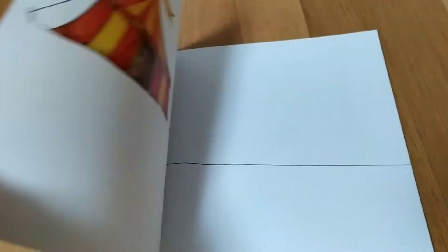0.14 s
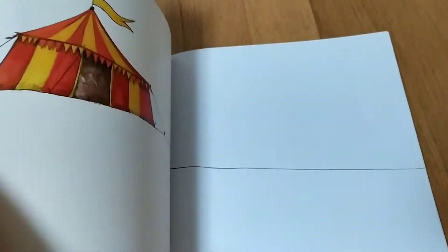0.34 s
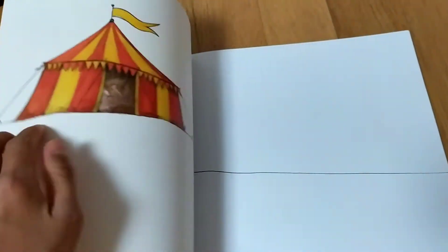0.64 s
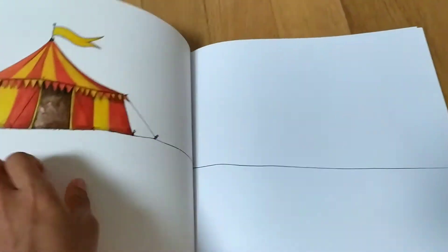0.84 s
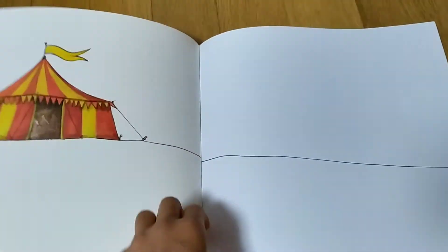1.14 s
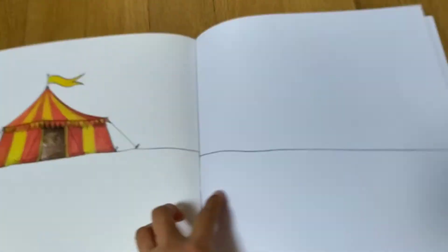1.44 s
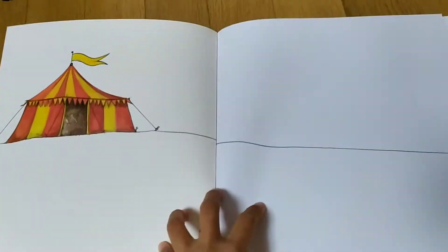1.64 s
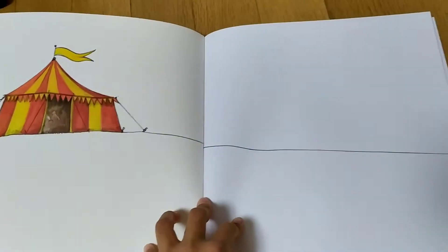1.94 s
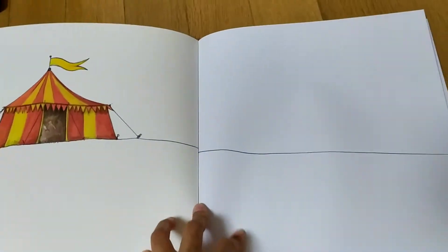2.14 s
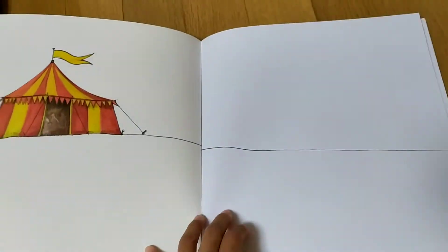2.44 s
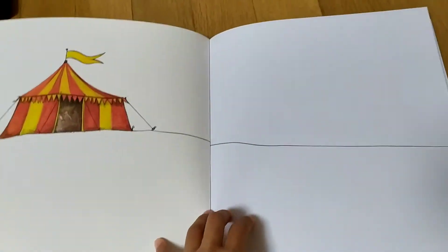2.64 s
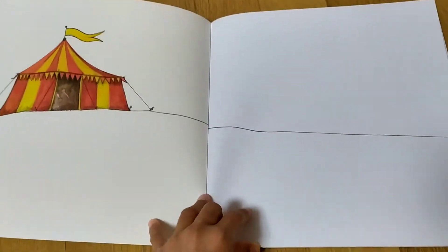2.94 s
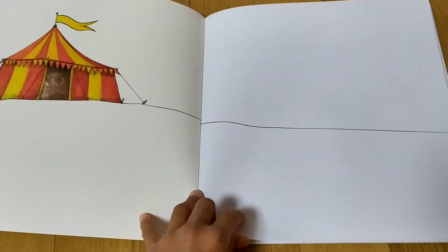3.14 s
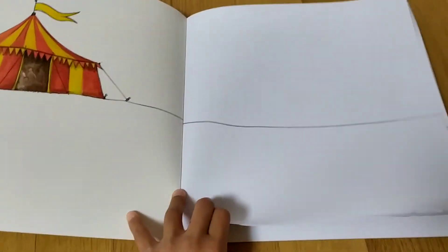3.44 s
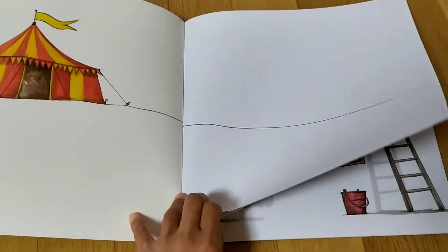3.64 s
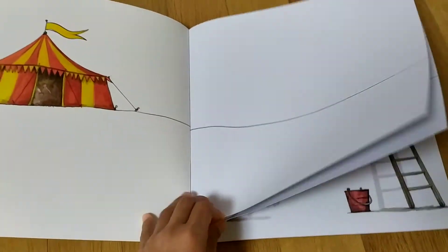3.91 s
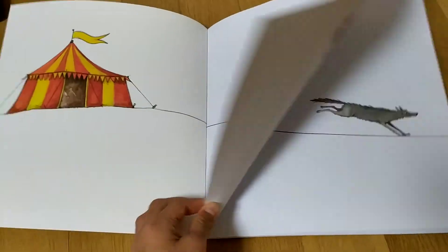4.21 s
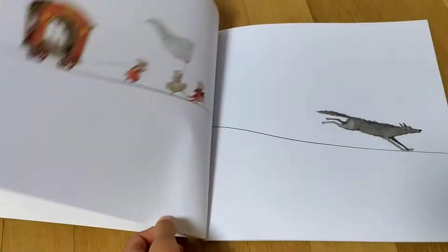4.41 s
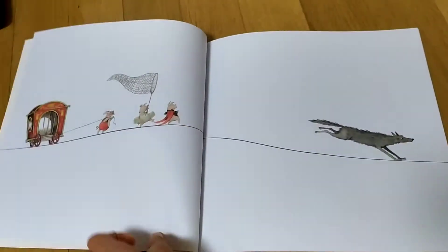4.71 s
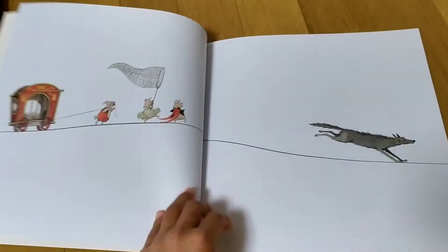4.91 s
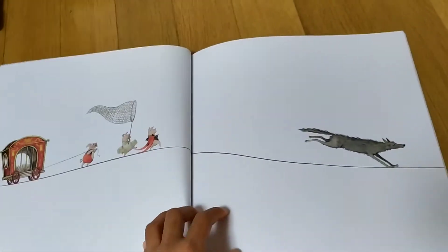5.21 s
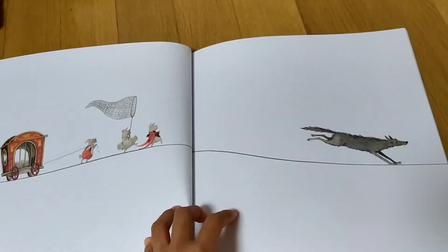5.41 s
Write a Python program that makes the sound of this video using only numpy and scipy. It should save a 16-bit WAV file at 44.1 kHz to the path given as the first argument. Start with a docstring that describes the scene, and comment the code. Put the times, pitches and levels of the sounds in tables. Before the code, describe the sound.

Close stereo phone pickup in a small quiet room: dry skin slides over thick paper, with dull pops as the sheet bends. Smoothing swishes swell at about one second, thin out, and a crisp loud snap stands alone. Light fingering follows, then scattered clicks build into a crackly page turn and fade to small ticks over soft hiss and wavering low rumble.

```python
"""Dry rubbing of skin on paper first: a hand slides over the stiff pages of a picture book and turns them.
Rubs are dense random stick-slip clicks, filtered into drag, scrape, hiss and flex and swelled per stroke.
Buckling sheets snap in few-ms crack bursts that ring damped modes.
A small furnished room answers with diffuse echoes, over filtered low noise that swells and wavers, and faint hiss.
Heard close up through the two ports of a phone."""
import sys
import numpy as np
from scipy import signal
from scipy.fft import rfft, irfft
from scipy.io import wavfile
from scipy.ndimage import uniform_filter1d, map_coordinates

SR = 44100
rng = np.random.default_rng(int(sys.argv[2]) if len(sys.argv) > 2 else 0)


def output_pcm(signal):
    """Save a mono or channel-first signal as 16-bit PCM at the path in sys.argv[1].

    Samples are clipped to [-1, 1] before scaling.
    """
    pcm = np.clip(np.atleast_2d(signal).T, -1, 1) * 32767
    wavfile.write(sys.argv[1], SR, np.round(pcm).astype(np.int16))


N = 245195
TIME_S = np.arange(N) / SR

# Rise and fade times below 5 ms, negatives included, act as 5 ms.
# strokes over paper: full from t/s, rise/(s per 20 dB), hold/s, fade/(s per 20 dB), level/dB,
# weight/dB (heavy and dull above 0, light and fine below)
STROKES = [(0.088, 0.038, 0.0034, 0.092, -52.5, -8.5), (.21, .06, 0.035, 0.15, -66, -2.5),
           (.42, 0.23, 0.058, .05, -66, -3), (.55, 0.091, 0.013, 0.048, -57, -1.5),
           (.60, 0.16, 0.025, 0.054, -60, -49), (.68, .03, 0.17, .05, -63, -11),
           (.84, .04, .04, .1, -54, -8), (.99, .16, 0.029, 0.12, -44, -4.5),
           (1.16, 0.17, .03, 0.092, -45, -1.5), (1.30, 0.12, .01, 0.043, -56, 0),
           (1.365, 0.11, 0.026, 0.07, -54.5, -1), (1.469, 0.11, 0.055, 0.077, -48, 0.5),
           (1.575, 0.18, 0.019, 0.12, -49, 5), (1.64, .1, 0.044, 0.03, -51.5, -3.5),
           (1.72, 0.046, .13, 0.04, -61.5, -5.5), (1.89, 0.051, 0.022, 0.076, -55, -6),
           (2.225, 0.012, 0.12, 0.059, -59, -3), (2.335, 0.065, 0.023, 0.055, -44.5, -15),
           (2.373, 0.041, 0.0083, 0.077, -44.5, 4), (2.46, .05, 0.065, 0.056, -62, -11),
           (2.599, 0.032, 0.087, 0.15, -63.5, -9.5), (2.808, 0.027, 0.11, 0.041, -63, -7.5),
           (2.98, 0.043, .02, 0.11, -52, -9), (3.06, 0.055, 0.048, 0.037, -60.5, -11),
           (3.2, 0.11, 0.0093, 0.022, -68, -8), (3.319, 0.014, 0.0078, 0.089, -56, -4),
           (3.43, 0.098, 0.013, 0.18, -56.5, -13), (3.58, .03, 0.12, .05, -70, 6),
           (3.72, 0.024, 0.059, 0.044, -57.5, 4), (3.82, 0.06, 0.033, 0.032, -45.5, -13),
           (3.868, 0.029, 0.0044, 0.099, -52, 1.5), (4.024, 0.035, 0.024, 0.094, -55.5, 3),
           (4.089, 0.034, 0.011, 0.055, -53, 2), (4.16, 0.055, 0.11, .05, -60.5, -5),
           (4.28, 0.065, 0.096, .05, -58, -2), (4.384, 0.059, 0.043, 0.065, -53.5, -1),
           (4.488, 0.088, 0.0051, 0.099, -47.5, 1), (4.644, 0.028, 0.016, .03, -53, -25),
           (4.684, 0.039, 0.018, 0.084, -45, -3), (4.8, 0.073, 0.009, .08, -63, -15),
           (4.9, .08, 0.03, .05, -68.5, -3), (4.973, 0.026, 0.0058, 0.078, -48, -10),
           (5.04, 0.055, 0.031, 0.064, -60.5, -10), (5.171, 0.051, 0.074, 0.13, -52.5, -0.5),
           (5.36, 0.055, 0.061, 0.057, -71.5, -24), (5.49, 0.098, 0.0072, 0.059, -67, -3)]
# drag, scrape, hiss against the stroke: offset/dB, slope/(dB per dB of weight)
STROKE_FOLLOW = [(-2, 0.96), (-1, 0.2), (0, -0.12)]
# sheet bending and fluttering: full from t/s, level/dB, rise/(s per 20 dB), hold/s, fade/(s per 20 dB)
BENDS = [(0.09, -67.5, 0.7, .01, 0.27), (.47, -68.5, 0.24, 0.0092, 0.6), (0.54, -55.5, -0.19, 0.016, 0.04),
         (0.779, -60, -0.02, .01, .03), (0.836, -65, 0.2, .01, 0.4), (0.99, -61.5, 0.23, 0.0089, 0.34),
         (1.161, -51.5, 0.01, 0.03, 0.07), (1.339, -53.5, 0.1, 0.026, 0.04),
         (1.464, -56.5, -0.2, 0.011, 0.16), (1.725, -66, 0.2, 0.0093, 0.35),
         (1.913, -66, -0.4, 0.0067, 0.24), (2.362, -53.5, 0.08, 0.016, 0.12),
         (2.968, -66.5, 0.5, 0.046, -0.08), (3.32, -65, -0.15, .01, 0.15), (3.431, -58, -0.07, .01, 0),
         (3.496, -65, -0.1, 0.3, 0), (3.778, -59.5, 0.12, 0.1, 0.7), (4.039, -55.5, -0.06, .05, 0.26),
         (4.24, -55.5, 0.18, .01, -0.01), (4.29, -60.5, 0.7, 0.055, -0.2), (4.37, -57, 0.12, 0.0086, -0.13),
         (4.437, -50.5, -0.03, 0.064, 0.07), (4.564, -64.5, 0.3, 0.045, .06),
         (4.66, -59.5, -0.5, 0.045, .06), (4.79, -72, -1.2, 0.0077, 0.2), (4.97, -61.5, -0.1, 0.0077, 0.06),
         (5.17, -67.5, 0.5, 0.057, 0.5)]
# relative spectra of the four rubbing layers: f/Hz, density/dB
DRAG_SPECTRUM = [(200, -60), (400, -38), (520, -8), (650, -4.5), (820, 0), (1100, -6), (1450, -3),
                 (2000, -12), (4000, -68)]
SCRAPE_SPECTRUM = [(400, -70), (1000, -15), (1500, -8), (2200, -5.5), (2900, -4.5), (3500, -9),
                   (4200, -13.5), (5500, -30), (10000, -56)]
HISS_SPECTRUM = [(900, -50), (2600, -5), (3500, -10), (5500, -5.5), (6800, -9), (9300, -7.5), (11000, -11),
                 (13300, -15), (15500, -13.5), (16500, -22)]
FLEX_SPECTRUM = [(100, -11), (200, -13.5), (320, 3), (500, -1.5), (800, -5), (2000, -64)]

# buckling snaps: start t/s, knock level/dB, click level/dB, crisp level/dB, thud level/dB, burst rise/ms
SNAPS = [(.046, -56.5, -51, -62, -53, 1.7), (0.223, -43, -42, -55, -46, 4),
         (0.467, -49.5, -51, -76, -51, 1.95), (.502, -36, -34, -43.5, -39, 1.8),
         (.549, -64, -45, -66, -46, 2.1), (.82, -44, -40, -46.5, -36.5, 1.4),
         (.856, -51, -65, -54, -75, 1.5), (0.938, -58, -55, -64, -49, 1.8),
         (1.299, -46.5, -51, -70, -64, 1.36), (1.328, -32.5, -42.5, -65, -37, 3.1),
         (1.395, -56, -46.5, -63, -74, 2), (1.722, -49.5, -64, -70, -55, 1.5),
         (1.903, -47.5, -51, -41, -56, 1.93), (2.209, -49.5, -48.5, -51, -70, 1.93),
         (2.225, -64, -51.5, -50, -63, 4.4), (2.352, -48.5, -37, -37, -60, 3.4),
         (2.357, -25, -22, -33.5, -42, 1.8), (2.364, -33.5, -38, -40, -55, 2.5),
         (2.874, -78, -61, -51, -78, 3.3), (2.883, -67, -59, -49.5, -66.5, 2.2),
         (2.951, -46, -47.5, -50.5, -51, 2.1), (3.31, -59.5, -51.5, -49, -58, 2.5),
         (3.526, -35.5, -35.5, -54, -45.5, 3.4), (3.532, -34, -64, -54, -43, 2.85),
         (3.539, -45, -62, -57, -65, 2.3), (3.548, -68, -38.5, -69, -50, 1.02),
         (3.553, -35.5, -72, -59, -46, 1.6), (3.702, -42, -44.5, -49.5, -54, 2.1),
         (3.754, -57, -46.5, -54, -50, 1.2), (3.856, -29, -42, -50, -51, 0.64),
         (4.003, -48.5, -67, -79, -47.5, 1.2), (4.011, -29.5, -27.5, -58, -51, 1.6),
         (4.067, -52, -43, -52, -61, 2.5), (4.073, -55, -50, -43, -65, 3.5),
         (4.078, -35.5, -39, -39, -47, 1.92), (4.237, -48, -64, -54, -67, 2.55),
         (4.392, -36.5, -67, -47, -43, 2.56), (4.44, -63, -66, -50, -45, 0.87),
         (4.446, -37, -48, -50, -39.5, 1.9), (4.465, -47, -50, -46, -60, 2.6),
         (4.472, -32, -29, -34.5, -55, 2.42), (4.483, -33.5, -45, -48, -42.5, 1.6),
         (4.634, -60, -58, -44.5, -64, 2.5), (4.673, -36.5, -29.5, -26, -57, 2.54),
         (4.955, -47, -47.5, -41.5, -45.5, 1.35), (4.965, -46, -47.5, -40.5, -43.5, 2.6),
         (5.155, -35.5, -31, -71, -67, 1.6), (5.206, -46.5, -66, -52, -50, 1.4),
         (5.222, -55, -42.5, -39.5, -48, 1.75), (5.243, -44, -39, -42.5, -50.5, 3.8),
         (5.282, -47.5, -55, -49, -56, 2.1), (5.334, -54.5, -68, -58, -55, 4.2),
         (5.526, -58, -68, -75, -82, 3.25)]
# sheet modes before scatter: f/Hz, level/dB, t60/s
SHEET_MODES = [(342, 6.5, 0.03), (497, -5.5, 0.017), (822, -6, 0.035), (1173, -8, 0.042),
               (1496, 11.5, 0.0071), (2310, 10, 0.0031), (2850, 4, 0.019)]
SNAP_ENERGY_DB = 21  # added to every part level: part energy, in samples
RATTLE_DB, RING_DB = -22.5, -33.0

# room: f/Hz, t60/s, left-right likeness/0-1 (also used for the background hiss)
ROOM = [(102, 0.2, 1), (490, 0.24, 0.45), (2150, 0.22, 0.18), (6960, 0.23, 0.1), (14400, 0.032, 0.1)]
ROOM_DB = -8

# low rumble swells: peak t/s, level/dB, rise/(s per 20 dB), fade/(s per 20 dB)
LOW_SWELLS = [(.51, -61, 0.3, 0.35), (0.819, -50, -0.58, -0.86), (.93, -53, -0.42, -0.1),
              (1.19, -61.5, 0.04, 0.14), (2.37, -65, -0.05, 0.26), (3.87, -63, 0.38, 0.6),
              (4.03, -64, -0.05, 1.2), (4.4, -45, 0.02, -0.53), (4.52, -49, .12, 0.19),
              (4.97, -63.5, -0.35, -0.6), (5.31, -56, -1.2, -0.3)]
# relative spectrum of the low noise: f/Hz, density/dB
LOW_SPECTRUM = [(13, -37), (22, -27), (38, -9), (54, 4), (170, -7.5), (220, -16), (370, -120)]
LOW_FLOOR_DB, LOW_WAVER_DB = -70, 1.2
# relative spectrum of the background hiss: f/Hz, density/dB
QUIET_SPECTRUM = [(76, -45), (130, -12), (317, -8.5), (430, -20), (516, -12), (571, -15), (1340, -16),
                  (8980, -20), (12900, -22), (16500, -33)]
QUIET_DB, QUIET_WAVER_DB = -69.5, 1.4

# extra path to the left port: t/s, lag/s
LEFT_LAG = [(0, 0.00022), (1.2, 0.00013), (2.2, 0.000057), (5.56, 0.00017)]
# port colour: f/Hz, left minus right/dB
LEFT_TILT = [(30, 8), (60, 5), (125, 1.6), (250, 2), (500, -2), (1000, .4), (2500, 2.6), (8000, .8),
             (13000, 3)]
LOW_CUT_HZ, TOP_HZ = 38, 15950


def sliding():
    """Fibres catch and let go: slow slips drag and rumble as the sheet bends, quick ones scrape, fine ones hiss."""
    layers = (
        (DRAG_SPECTRUM, slips(per_s=3000, spread_db=2.2, patchy_db=1.5, apart=.35)),
        (SCRAPE_SPECTRUM, slips(per_s=5000, spread_db=2.1, patchy_db=1.5, apart=.7)),
        (HISS_SPECTRUM, slips(per_s=12000, spread_db=0.5, patchy_db=1.7, apart=1.7)),
        (FLEX_SPECTRUM, slips(per_s=2300, spread_db=0.0, patchy_db=-0.5, apart=0.2)))
    # overlapping strokes and bends add in power
    stroke_powers = np.array([swell(*row[:4]) ** 2 for row in STROKES])
    level_db, weight_db = np.transpose(STROKES)[4:]
    offset_db, slope = np.transpose(STROKE_FOLLOW)[:, :, None]
    layer_db = level_db + offset_db + slope * weight_db
    stroke_gains = np.sqrt(undb(2 * layer_db) @ stroke_powers)
    bend_gain = np.sqrt(sum((undb(db) * swell(s, *shape)) ** 2 for s, db, *shape in BENDS))
    gains = [*stroke_gains, bend_gain]
    return sum(unit(colour(x, spectrum)) * gain for (spectrum, x), gain in zip(layers, gains))


def slips(per_s, spread_db, patchy_db, apart):
    """Stick-slip clicks of uneven size in patches: one train shared by both ports, plus one of each port's own."""
    struck = rng.random((3, N)) < per_s / SR
    clicks = struck * rng.standard_normal((3, N)) * undb(spread_db * rng.exponential(size=(3, N)))
    patches_db = patchy_db * walk(90) + 1.2 * walk(20)
    return (clicks[0] + apart * clicks[1:]) * undb(patches_db)


def snaps():
    """Each buckle is a few ms of cracks that briefly ring the sheet, then a rattle dies away."""
    size, modes = int(SR / 8), len(SHEET_MODES)
    t = np.arange(size) / SR
    out = np.zeros((2, N + size))
    chance = rng.standard_normal((len(SNAPS), 4 * size + 2 * modes))
    for (start_s, knock_db, click_db, crisp_db, thud_db, rise_ms), draws in zip(SNAPS, chance):
        span = t / (rise_ms / 1000)
        rattle = np.exp(-t / 0.018) * (1 - np.exp(-span))
        burst = (span * np.exp(1 - span)) ** 2 + undb(RATTLE_DB) * rattle
        grain = draws[:size]
        cracks = grain * np.abs(draws[size:2 * size]) * burst
        cracks[np.argmax(burst)] += 5.0  # main fold gives way
        body = cracks + undb(RING_DB) * signal.fftconvolve(cracks, sheet_ring(t, draws[-2 * modes:]))[:size]
        port_grain = draws[2 * size:4 * size].reshape(2, -1)
        crisp = (port_grain + 0.66 * grain) * burst
        parts = (
            (band(body, 408, 1065), knock_db),
            (band(body, 1570, 3300), click_db),
            (band(crisp, 2660, 11900), crisp_db),
            (band(cracks, 103, 388), thud_db))
        start = int(start_s * SR)
        for part, db in parts:
            energy = np.sum(part ** 2) / part.ndim  # per port
            out[:, start:start + size] += undb(db + SNAP_ENERGY_DB) * part / np.sqrt(energy)
    return out[:, :N]


def sheet_ring(t, draws):
    """Damped sheet modes; each bend of the page scatters their pitch and level."""
    pitch_draws, level_draws = draws.reshape(2, -1)
    ring = np.zeros(len(t))
    for (hz, db, t60_s), pitch, level in zip(SHEET_MODES, pitch_draws, level_draws):
        tone = np.sin(2 * np.pi * hz * (1 + 0.087 * pitch) * t)
        ring += undb(db + 2.06 * level) * tone * 1000 ** (-t / t60_s)
    return ring


def at_ports(book):
    """The left port is a little further from the page, so its sound arrives late by a drifting lag."""
    lag_s = np.interp(TIME_S, *np.transpose(LEFT_LAG))
    read_at = np.arange(N) - SR * lag_s
    return np.array([map_coordinates(book[0], [read_at], order=3), book[1]])


def room(x):
    """Diffuse echoes, each octave fading at its own pace, starting with the nearest wall."""
    size = SR // 2
    t = np.arange(size) / SR
    noise = pair(across(ROOM, size)[1], size)
    hz, t60_s, _ = np.transpose(ROOM)
    tail = np.zeros((2, size))
    for octave_hz in 64 * 2. ** np.arange(9):
        octave_t60_s = np.interp(np.log(octave_hz), np.log(hz), t60_s)
        octave = band(noise, octave_hz / np.sqrt(2), octave_hz * np.sqrt(2))
        tail += octave * 1000 ** (-t / octave_t60_s)
    tail *= np.clip(t / 0.0023 - .4, 0, 1)  # silent for 0.9 ms, full by 3.2 ms
    tail /= np.sqrt(np.sum(tail ** 2) / 2)
    return signal.fftconvolve(x[None], tail, axes=1)[:, :N] * undb(ROOM_DB)


def low_noise():
    """Filtered low noise that swells and wavers, about half alike at the two ports."""
    noise = colour(pair(.55, N), LOW_SPECTRUM)
    floor_gain = undb(LOW_FLOOR_DB + LOW_WAVER_DB * walk(26))
    swell_gain = sum(undb(db) * swell(s, rise_s, 0, fade_s) for s, db, rise_s, fade_s in LOW_SWELLS)
    return unit(noise) * (floor_gain + swell_gain)


def quiet():
    """Faint, slowly wavering hiss of room and microphone: filtered noise."""
    noises = pair(across(ROOM, N)[1], N)
    hiss = np.array([colour(noise, QUIET_SPECTRUM) for noise in noises])
    return unit(hiss) * undb(QUIET_DB + QUIET_WAVER_DB * walk(7.2))


def swell(s, rise_s, hold_s, fade_s):
    """Gain that climbs tenfold per rise_s to 1 at s, holds, and falls tenfold per fade_s."""
    early = (s - TIME_S) / max(rise_s, .005)
    late = (TIME_S - s - hold_s) / max(fade_s, .005)
    return 10 ** -np.maximum(np.maximum(early, late), 0)


def walk(rate_hz):
    """Random levels held 1 / rate_hz and slewed, at unit RMS."""
    k = int(SR / rate_hz)
    steps = np.repeat(rng.standard_normal(N // k + 1), k)
    return unit(uniform_filter1d(steps, k)[:N])


def pair(likeness, size):
    """Two noises that are alike by the given share in each bin."""
    mid, side = rfft(rng.standard_normal((2, size)))
    c = np.clip(likeness, 0, 1)
    signs = np.array([[1], [-1]])
    return irfft(mid * np.sqrt((1 + c) / 2) + side * np.sqrt((1 - c) / 2) * signs, size)


def across(rows, size):
    """Columns of a frequency table at every bin of a transform, interpolated over log f."""
    hz, *columns = np.transpose(rows)
    log_hz = np.log(np.fft.rfftfreq(size, 1 / SR) + 1)
    return [np.interp(log_hz, np.log(hz), column) for column in columns]


def colour(x, rows):
    """Filter x by a (f/Hz, gain/dB) table."""
    return irfft(rfft(x) * undb(across(rows, N)[0]), N)


def band(x, lo_hz, hi_hz):
    """Butterworth band-pass, top edge kept below Nyquist."""
    sos = signal.butter(2, [lo_hz, min(hi_hz, .45 * SR)], "bandpass", fs=SR, output="sos")
    return signal.sosfilt(sos, x)


def undb(db):
    """Amplitude of a level in dB."""
    return 10 ** (np.asarray(db) / 20)


def unit(x):
    """Scale to unit RMS."""
    return x / np.sqrt(np.mean(x ** 2))


def scene():
    """Book at the two ports, its room echoes, low noise and background hiss."""
    book = sliding() + snaps()
    return at_ports(book) + room(book.mean(axis=0)) + low_noise() + quiet()


def record(dry):
    """The two ports colour the sound differently; the phone cuts the deepest bass and the top."""
    half_tilt_db = across(LEFT_TILT, N)[0] / 2
    ports = irfft(rfft(dry) * undb(np.array([half_tilt_db, -half_tilt_db])), N)
    low_cut = signal.butter(6, LOW_CUT_HZ, "highpass", fs=SR, output="sos")
    top_cut = signal.ellip(10, .2, 70, TOP_HZ, fs=SR, output="sos")
    return signal.sosfilt(top_cut, signal.sosfilt(low_cut, ports))


dry = scene()
out = record(dry)
output_pcm(out)
```